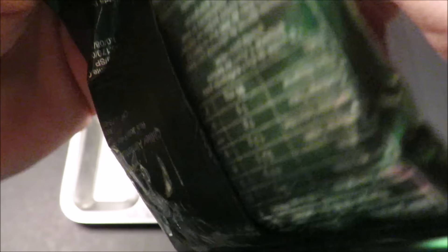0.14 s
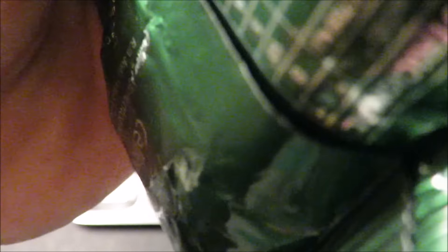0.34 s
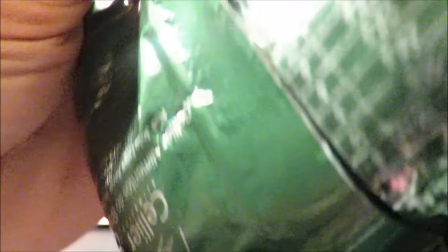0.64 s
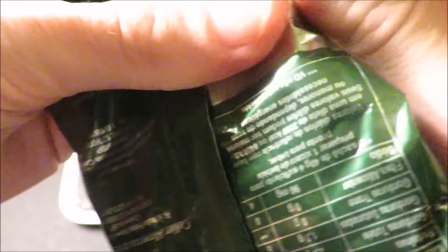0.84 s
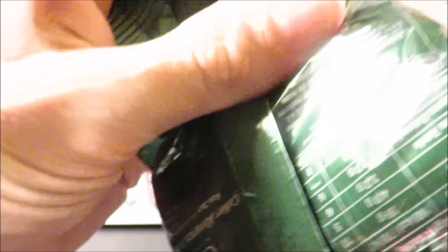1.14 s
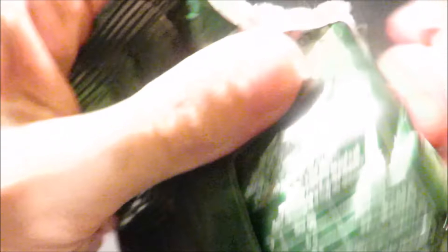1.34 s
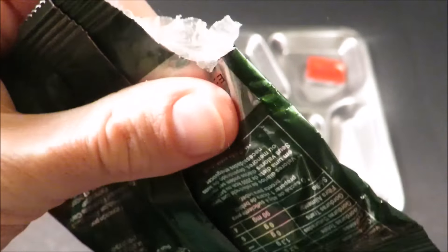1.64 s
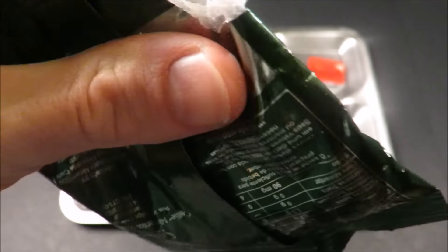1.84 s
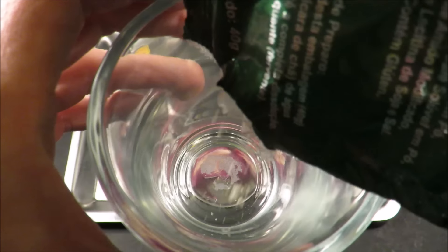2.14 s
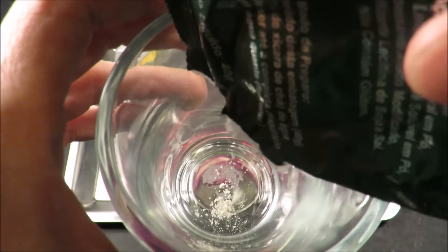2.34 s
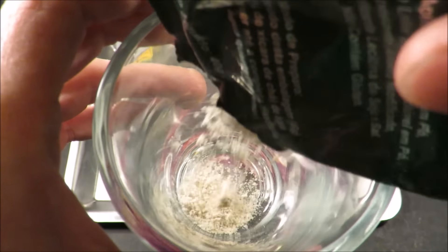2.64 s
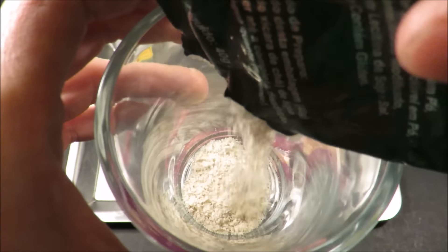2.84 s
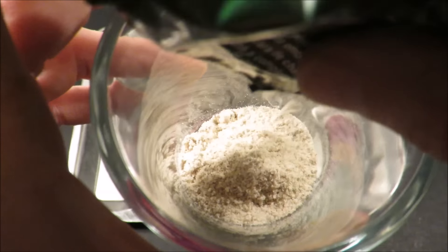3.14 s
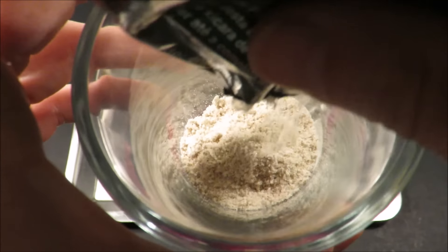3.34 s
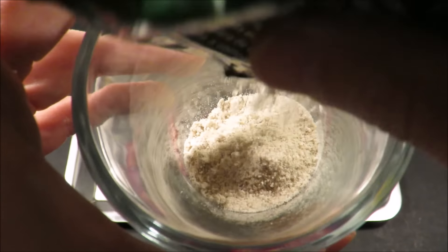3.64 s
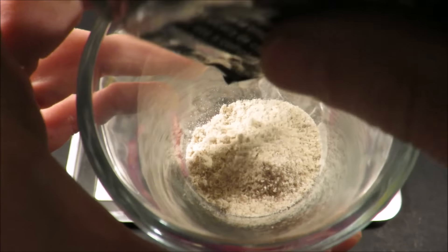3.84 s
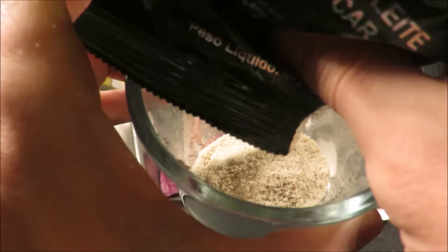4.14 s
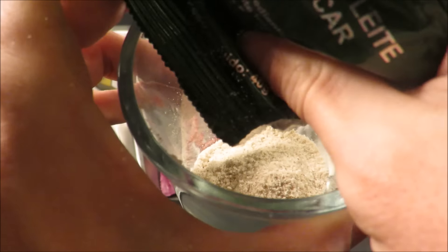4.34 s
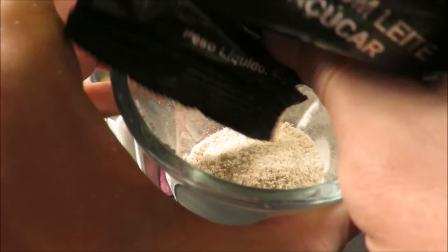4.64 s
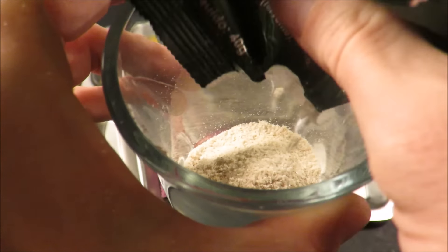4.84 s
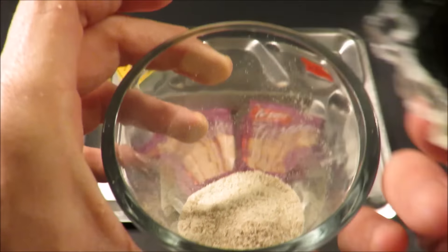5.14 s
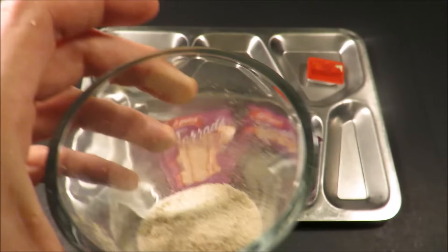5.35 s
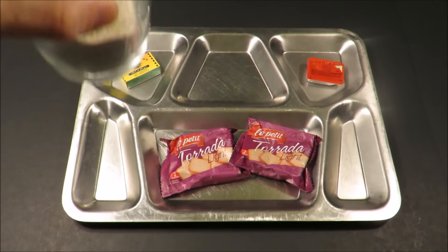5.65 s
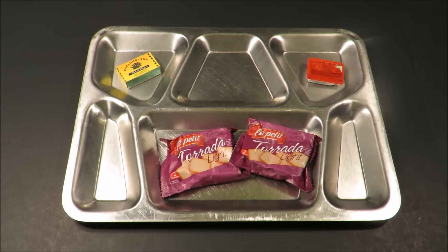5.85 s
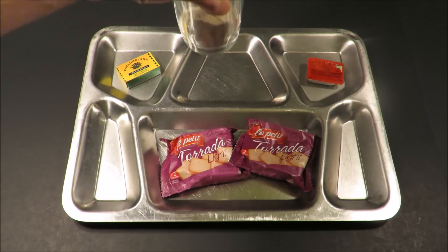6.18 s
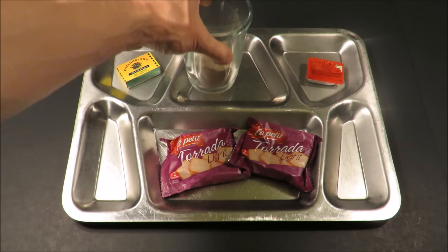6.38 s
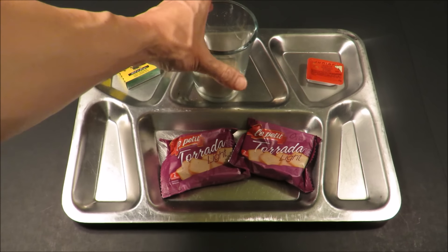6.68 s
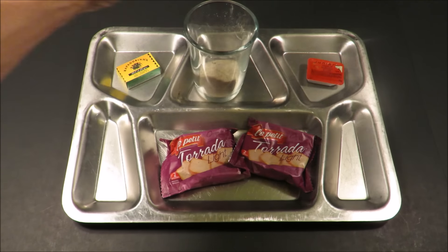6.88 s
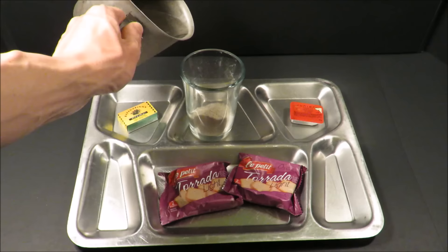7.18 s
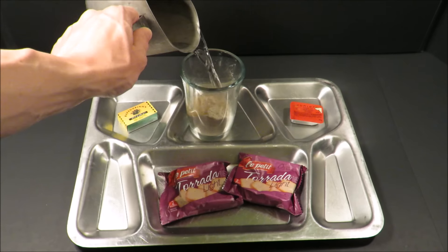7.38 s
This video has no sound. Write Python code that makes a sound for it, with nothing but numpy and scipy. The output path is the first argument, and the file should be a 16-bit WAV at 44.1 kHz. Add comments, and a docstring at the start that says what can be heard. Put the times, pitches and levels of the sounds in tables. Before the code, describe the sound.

A foil sachet crackles and snaps up close, powder hisses into a glass amid bumps, then the glass knocks onto a metal tray and water starts.

```python
"""A small quiet room, the microphone close to a foil sachet pulled open over a drinking glass.
The film creaks, snaps and crunches as its creases buckle; powder hisses and patters into the glass,
whose air rings. The pouch bumps the rim; empty, it is crumpled aside, further off. The glass lands
on a steel tray with two knocks, made of noise and ringing modes, and a thin stream of water starts."""
import sys
import numpy as np
from scipy import signal
from scipy.fft import rfft, irfft
from scipy.io import wavfile
from scipy.ndimage import uniform_filter1d

SR = 44100
rng = np.random.default_rng(int(sys.argv[2]) if len(sys.argv) > 2 else 0)


def int16_out(signal):
    """Quantize to a 16-bit WAV file."""
    q = np.round(np.clip(np.atleast_2d(signal).T, -1, 1) * 32767)
    wavfile.write(sys.argv[1], SR, q.astype(np.int16))


N = 331411
TIME = np.arange(N) / SR


def from_db(db):
    """Decibels to amplitude."""
    return 10 ** (np.asarray(db) / 20)


def rms_one(x):
    """Scale to an RMS of 1."""
    return x / np.sqrt(np.mean(x ** 2) + 1e-20)


def gains(rows):
    """Level columns joined in time, silent outside their span."""
    s, *columns = np.transpose(rows)
    inside = (TIME >= s[0]) & (TIME <= s[-1])
    return [from_db(np.interp(TIME, s, c)) * inside for c in columns]


def swell(s, hold_s, rise_db_per_s, fall_db_per_s):
    """A gain that rises to 1 at time s, holds and falls away."""
    before_db = rise_db_per_s * (s - TIME)
    after_db = fall_db_per_s * (TIME - s - hold_s)
    return from_db(-np.clip(np.maximum(before_db, after_db), 0, 200))


def clumps(per_s, spread_db):
    """A gain that swells and sinks at random, about per_s times a second."""
    levels = rng.standard_normal(N).clip(-2, 2)
    return from_db(spread_db * np.interp(TIME * per_s, np.arange(N), levels))


def add(out, s, sound):
    """Mix a sound into the stereo output at time s."""
    at = round(s * SR)
    out[:, at:at + sound.shape[-1]] += sound[..., :N - at]


def noise(size):
    """White stereo noise, nearly alike on both sides."""
    mid, side = rng.standard_normal((2, size))
    return rms_one(mid + from_db(-6.5) * side * [[1], [-1]])


def colour(x, spectrum):
    """Causal (minimum-phase) filter with this spectrum and unit power gain for white noise."""
    size = 4096
    hz, db = np.transpose(spectrum)
    grid = np.log(np.fft.rfftfreq(size, 1 / SR) + 1)
    cepstrum = irfft(np.log(from_db(np.interp(grid, np.log(hz), db))))
    # folding the cepstrum forward makes the response causal
    cepstrum[1:size // 2] *= 2
    cepstrum[size // 2 + 1:] = 0
    response = irfft(np.exp(rfft(cepstrum)))[:size // 2]
    return signal.fftconvolve(x, response[None] / np.linalg.norm(response))[:, :x.shape[1]]


def dying(t, t60):
    """Exponential decay that reaches -60 dB after t60 seconds."""
    return from_db(-60 * t / t60)


def mode(t, hz, t60):
    """One struck resonance: a decaying sine."""
    return np.sin(2 * np.pi * hz * t) * dying(t, t60)


def ring(clicks, hz, cycles):
    """Each click rings at hz for some cycles (to -60 dB), with the same energy at every pitch."""
    r = from_db(-60 * hz / (cycles * SR))
    feed = np.sqrt(1 - r * r) * np.array([1, 0, -1])
    return signal.lfilter(feed, [1, -2 * r * np.cos(2 * np.pi * hz / SR), r * r], clicks + 1e-18)


def burst(x):
    """Scale a short sound to the energy of one millisecond at level 1."""
    return x / np.sqrt(np.mean(np.sum(x ** 2, axis=-1)) * 1000 / SR)


# faint broadband tone of the room: pitch_hz, level_db (per Hz, relative)
ROOM_TONE = [(55, -22), (550, -22.5), (16000, -44)]


def room_tone():
    """Steady low-weighted noise of the quiet room, rising slightly over the first two seconds."""
    return from_db(np.interp(TIME, [0, 2], [-66, -62])) * colour(noise(N), ROOM_TONE)


def creases(per_s, spread_db, clump_db):
    """Tiny creases give way at random, in little avalanches."""
    born = rng.random(N) < per_s / SR
    heights = from_db(spread_db * np.minimum(rng.exponential(1, N), 3))
    sizes = born * heights * rng.choice([-1, 1], N)
    sizes = sizes * clumps(200, clump_db)
    # dividing by the local level keeps the crackle's loudness even
    local_power = np.abs(uniform_filter1d(sizes ** 2, size=1500))
    return sizes / np.sqrt(local_power + np.mean(sizes ** 2) / 20)


def crackle(clicks, low_hz, high_hz, cycles, hiss_db):
    """Every crease rings a facet with a pitch of its own, over the hiss of sliding film."""
    pitches = np.geomspace(low_hz, high_hz, 20)
    dealt = rng.integers(0, len(pitches), N)
    clicks = clicks * (1 + 0.26 * rng.standard_normal(N) * [[1], [-1]])
    out = np.zeros((2, N))
    for k, hz in enumerate(pitches):
        # the folds favour ever-changing facets
        own_clicks = clicks * (dealt == k) * clumps(45, 5)
        # higher pitches are weighted up to even the power per Hz
        out += np.sqrt(hz) * ring(own_clicks, hz, cycles)
    return rms_one(rms_one(out) + from_db(hiss_db) * noise(N))


# the fingers squeeze the film: start_s, hold_s, strength_db, fine_db (fine creases against broad ones)
SQUEEZES = [(0.034, 0.052, -45.5, -7.5), (0.158, 0.26, -39, -6.5), (0.289, 0.06, -34.5, 3.5),
            (0.558, 0.06, -51, 2.5), (0.798, 0.012, -47.5, -2), (0.875, 0.037, -34.5, -3.5),
            (0.959, 0.066, -41, -3.5), (1.085, 0.016, -31, 0.5), (1.17, 0.14, -50.5, 3.5),
            (1.392, 0.13, -44, -6), (1.49, 0.012, -32.5, -4.5), (1.601, 0.014, -37.5, -7.5),
            (1.688, 0.046, -43, -4.5), (1.782, 0.057, -41, -2.5), (2.025, 0.035, -54, 10),
            (3.633, 0.036, -36.5, -11), (3.816, 0.051, -46.5, -12), (4.039, 0.045, -34, -5.5),
            (4.244, 0.12, -36, -4), (4.417, 0.066, -38.5, -3.5), (4.562, 0.12, -33, -1.5),
            (4.772, 0.06, -32.5, -1), (4.926, 0.046, -37.5, -4), (5.174, 0.012, -43, -13)]
SQUEEZE_RISE_DB_PER_S, SQUEEZE_FALL_DB_PER_S = 591, 334
# between squeezes the held film keeps creaking faintly, until it is taken away
HELD_DB, HELD_FINE_DB, HELD_UNTIL_S = -61, -5, 5.0


def flexing():
    """How hard broad and fine creases are worked: the light hold plus every squeeze, added in power."""
    held = from_db(HELD_DB) * swell(0, HELD_UNTIL_S, SQUEEZE_RISE_DB_PER_S, SQUEEZE_FALL_DB_PER_S)
    broad, fine = held ** 2, (from_db(HELD_FINE_DB) * held) ** 2
    for s, hold_s, db, fine_db in SQUEEZES:
        force = from_db(db) * swell(s, hold_s, SQUEEZE_RISE_DB_PER_S, SQUEEZE_FALL_DB_PER_S)
        broad = broad + force ** 2
        fine = fine + (from_db(fine_db) * force) ** 2
    return np.sqrt(broad), np.sqrt(fine)


# body of the broad creases: pitch_hz, level_db (per Hz, relative)
BROAD_CREASES = [(30, -38), (200, 6.5), (800, 5), (2600, 9), (5500, 2), (9000, -9)]
# sizzle of fine creases and sharp cracks: pitch_hz, level_db (per Hz, relative)
FINE_CREASES = [(500, -111), (3500, 10), (6500, 15.5), (12500, 14.5), (16000, 1.5)]
# the taut walls of the pouch drum along until it is open
DRUM_DB, DRUM_HZ, DRUM_CYCLES, OPEN_AT_S = -13, 330, 2.3, 0.96


def rustle():
    """Harder flexing breaks more creases a second; the same creases sound in every register."""
    broad, fine = flexing() * clumps(60, 1.5)  # the film yields unevenly
    crease_rate = 220 + 5000 * (broad / broad.max()) ** .7
    clicks = creases(crease_rate, spread_db=5.5, clump_db=6.5)
    body = colour(crackle(clicks, 536, 5270, cycles=7.9, hiss_db=-3.5), BROAD_CREASES)
    sizzle = colour(crackle(clicks, 5530, 15600, cycles=24.0, hiss_db=-5.0), FINE_CREASES)
    drum = from_db(DRUM_DB) * (TIME < OPEN_AT_S) * rms_one(ring(clicks, DRUM_HZ, DRUM_CYCLES))
    return broad * (from_db(2.16) * rms_one(body) + drum) + fine * rms_one(sizzle)


# single buckles of the film, loud and faint: start_s, ring_level_db, ring_pitch_hz, crack_level_db
SNAPS = [(0.0352, -23.5, 1840, -44), (0.093, -29.5, 7200, -51), (0.1426, -28, 2280, -32),
         (0.278, -28, 5200, -15.5), (0.4064, -39.5, 4600, -17), (0.4347, -11.5, 3300, -40.5),
         (0.506, -20.5, 2350, -28), (0.5562, -32, 2590, -24.5), (0.6322, -29.5, 2410, -31),
         (0.6842, -37, 1140, -66), (0.9138, -18.5, 750, -37), (1.024, -27, 3500, -29),
         (1.0496, -24.5, 6140, -35), (1.1065, -28, 1820, -13), (1.2568, -23, 3330, -28),
         (1.272, -26.5, 3640, -45), (1.3553, -30.5, 4170, -36), (1.377, -16, 2340, -36),
         (1.6121, -37, 3420, -16.5), (1.6832, -37, 4095, -26), (1.7864, -23.5, 3480, -24),
         (2.4507, -22, 6900, -23), (2.5911, -45, 890, -28), (2.8999, -23.5, 2500, -49),
         (3.0502, -12.5, 1400, -25), (3.122, -30.5, 1290, -39), (3.1526, -20, 2520, -26),
         (3.2155, -30, 1760, -41), (3.368, -30.5, 1510, -47), (3.659, -14, 2300, -15),
         (4.0956, -16, 5620, -22), (4.7374, -25, 2280, -42), (5.0433, -28, 4180, -35),
         (5.1096, -36, 2380, -66), (5.1472, -25.5, 1140, -61), (5.25, -42, 2620, -43)]


def snaps():
    """A facet pops through: a crack, a few cycles of the facet, a faint shiver around its pitch."""
    out, t = np.zeros((2, N)), TIME[:SR // 20]
    for s, ring_db, hz, crack_db in SNAPS:
        facet = burst(ring(ring(t == 0, hz, 6), hz, 1.3))
        lean = from_db(rng.normal(0, 0.26) * np.array([[1], [-1]]))  # slightly to one side
        shiver = burst(ring(noise(len(t)) * dying(t, .016), hz, 2.5))
        crack_decay = dying(t, .0018) + from_db(-21) * dying(t, .014)
        crack = burst(colour(noise(len(t)) * crack_decay, FINE_CREASES))
        ringing = lean * facet + from_db(-2.5) * shiver
        add(out, s, from_db(ring_db) * ringing + from_db(crack_db) * crack)
    return out


# a whole fold collapses: start_s (the peak), ring_level_db, ring_pitch_hz, crack_level_db
CRUNCHES = [(0.172, -19, 2410, -21.5), (0.295, -14.5, 1990, -29), (0.315, -16.5, 700, -27),
            (1.474, -22.5, 1490, -29.5), (1.826, -24.5, 1020, -25), (2.857, -21.5, 3000, -17),
            (3.181, -34, 1010, -55), (3.251, -17.5, 2060, -26), (3.639, -21, 1190, -30),
            (3.806, -11.5, 1600, -11.5), (4.080, -10, 2780, -17), (4.2332, -17.5, 1750, -26.5),
            (4.278, -14, 1480, -22), (4.4195, -16, 1140, -18.5), (4.794, -11.5, 1813, -16),
            (5.987, -17.5, 2180, -49)]
CRUNCH_T60_S, CRUNCH_FACETS_OCTAVES = 0.026, 0.54  # facets spread this far either way


def crunches():
    """A run of buckles swells and dies within milliseconds and rings several facets of unlike size."""
    out, t, lead_s = np.zeros((2, N)), TIME[:SR // 16], .012
    for s, ring_db, hz, crack_db in CRUNCHES:
        run = dying(np.maximum(t - lead_s, 2 * (lead_s - t)), CRUNCH_T60_S)
        pitches = hz * 2 ** (CRUNCH_FACETS_OCTAVES * np.linspace(-1, 1, num=5))
        # single buckles make the run uneven
        run = run * from_db(6 * np.interp(t * 1500, np.arange(len(t)), rng.standard_normal(len(t))))
        facets = burst(sum(burst(ring(noise(len(t)) * run, min(f, SR / 3), 5.2)) for f in pitches))
        crack = burst(colour(noise(len(t)) * run ** 2, FINE_CREASES))
        add(out, s - lead_s, from_db(ring_db) * facets + from_db(crack_db) * crack)
    return out


# a whole wall of the pouch flips outward: start_s, level_db
FLIPS = [(0.913, -25.5), (1.106, -25)]
FLIP_T60_S = 0.029
# soft film against fingers or glass: pitch_hz, level_db (per Hz, relative)
SCUFF = [(35, -12.5), (260, 10.5), (1500, 3), (5000, -23)]


def flips():
    """As the pouch is pulled open its walls flip with a soft, low thump."""
    out, t = np.zeros((2, N)), TIME[:SR // 10]
    for s, db in FLIPS:
        add(out, s, from_db(db) * burst(colour(noise(len(t)) * dying(t, FLIP_T60_S), SCUFF)))
    return out


# powder sliding into the hand-held glass: start_s, level_db
POUR = [(2.1, -62), (2.4, -49), (2.9, -47), (4.7, -51), (5.4, -68)]
# powder falling into the glass: pitch_hz, level_db (per Hz, relative)
POWDER = [(25, -21), (60, 5.5), (300, -2), (900, -6), (1700, -2), (2400, -9), (16000, -33)]
LUMPS_PER_S, LUMP_T60_S, LUMP_RING_DB = 55, 0.068, -7
# while the pouch is tipped, powder hisses over the film
SLIDE_AT_S, SLIDE_HOLD_S, SLIDE_DB, SLIDE_RISE_DB_PER_S = 2.673, 0.42, -45, 18
# powder over film: pitch_hz, level_db (per Hz, relative)
SLIDE = [(300, -13.5), (2000, 4.5), (16000, -4.5)]
GLASS_AIR_HZ, GLASS_AIR_T60_S = 756, 0.044
GLASS_AIR_CYCLES = GLASS_AIR_HZ * GLASS_AIR_T60_S


def powder():
    """Powder hisses over the film and drops in spurts; lumps patter and ring the air in the glass."""
    drops = (rng.random(N) < LUMPS_PER_S / SR) * rng.uniform(0.32, 1, N)
    spurts = .5 + rms_one(signal.fftconvolve(drops, dying(TIME[:SR // 10], LUMP_T60_S))[:N])
    grains = rms_one(noise(N) + 2 * rms_one(creases(1000, spread_db=5, clump_db=2)))
    patter = rms_one(spurts * colour(grains, POWDER))
    air = from_db(LUMP_RING_DB) * rms_one(ring(drops, GLASS_AIR_HZ, GLASS_AIR_CYCLES))
    tipped = swell(SLIDE_AT_S, SLIDE_HOLD_S, SLIDE_RISE_DB_PER_S, SQUEEZE_FALL_DB_PER_S)
    slide = from_db(SLIDE_DB) * tipped * rms_one(spurts * colour(grains, SLIDE))
    return gains(POUR)[0] * (patter + air) + slide


# the sachet hangs over the glass between these times
OVER_GLASS_FROM_S, OVER_GLASS_TO_S, HOLLOW_DB = 2.4, 5.0, -22.5


def hollow(film):
    """Crinkling over the mouth of the glass sets the air inside ringing."""
    over = (TIME > OVER_GLASS_FROM_S) & (TIME < OVER_GLASS_TO_S)
    return from_db(HOLLOW_DB) * ring(film * over, GLASS_AIR_HZ, GLASS_AIR_CYCLES)


# sachet bumps the glass: start_s, thud_level_db, hollow_ring_level_db, thud_pitch_hz
BUMPS = [(2.593, -36, -33, 137), (2.651, -39, -31, 292), (2.733, -40, -51, 124), (2.858, -27.5, -26, 157),
                 (3.05, -34.5, -19, 138), (3.249, -33, -24.5, 293), (3.438, -44, -36, 416),
         (3.531, -18.5, -23, 237), (3.5856, -20, -15.5, 222), (3.628, -25, -26, 121),
         (3.796, -25, -21.5, 261), (3.946, -28.5, -38, 275), (4.417, -55, -25, 330)]


def bumps():
    """The soft pouch brushes the rim, thuds on it and sets the air in the glass ringing."""
    out, t = np.zeros((2, N)), TIME[:SR // 10]
    for s, thud_db, ring_db, hz in BUMPS:
        scuff = from_db(thud_db) * burst(colour(noise(len(t)) * dying(t, 0.042), SCUFF))
        add(out, s - .011, scuff / 3)  # the brush just before the thud
        thud = from_db(5.5) * scuff - from_db(thud_db) * mode(t, hz, 0.058)
        add(out, s, thud + from_db(ring_db) * mode(t, GLASS_AIR_HZ, GLASS_AIR_T60_S))
    return out


# empty sachet crumpled further off: start_s, level_db (before an overall trim)
ASIDE = [(5.5, -65), (5.93, -30.5), (5.974, -36.5), (5.988, -29.5), (6.074, -31), (6.15, -34.5),
         (6.438, -35.5), (6.534, -26), (6.625, -46)]
# film heard from a distance: pitch_hz, level_db (per Hz, relative)
FAR_FILM = [(80, -14.5), (450, -13), (1100, -6.5), (2400, -5.5), (16000, -26.5)]
# once let go, it slowly unfolds
UNFOLD_DB, UNFOLD_FALL_DB_PER_S = -53, 18


def far_sachet():
    """The empty sachet is crumpled aside in gritty flurries, then creeps open again on its own."""
    clicks = creases(5000, spread_db=3.8, clump_db=3)
    far_creases = crackle(clicks, 500, 13000, cycles=14.0, hiss_db=-2)
    let_go_s = ASIDE[-1][0]
    unfolding = from_db(UNFOLD_DB) * swell(let_go_s, 0, SQUEEZE_RISE_DB_PER_S, UNFOLD_FALL_DB_PER_S)
    crumpling = from_db(-4.0) * gains(ASIDE)[0]
    return (crumpling + unfolding) * clumps(90, 2.24) * colour(far_creases, FAR_FILM)


# glass lands on the tray: start_s, clack_level_db, thump_level_db, thump_pitch_hz, ring_level_db
LANDINGS = [(6.6168, -8.5, -4, 302, -30), (6.672, -32, -10.5, 716, -29.5)]
# glass base against steel: pitch_hz, level_db (per Hz, relative)
CLACK = [(200, -15), (850, -2.5), (4500, -10), (16000, -25.5)]
# modes of the steel tray: pitch_hz, level_db (relative)
TRAY = [(822, 4), (1015, -2), (1535, -0.5), (2245, -6), (2510, -18)]
TRAY_T60_S = 0.19
# the glass rocks to rest with a rough, sinking note
SETTLE_AT_S, SETTLE_DB = 6.728, -39
SETTLE_FROM_HZ, SETTLE_TO_HZ, SETTLE_GLIDE_S = 930, 450, 0.023


def landings():
    """One edge of the base hits the tray, then the other; the steel rings and the glass rocks to rest."""
    out, t = np.zeros((2, N)), TIME[:SR // 2]
    for s, clack_db, thump_db, thump_hz, ring_db in LANDINGS:
        clack_decay = dying(t, 0.032) + from_db(-19) * dying(t, TRAY_T60_S)
        clack = colour(noise(len(t)) * clack_decay, CLACK)
        # the weight of the glass pushes the tray down; its floor drums
        thump = burst(ring(t == 0, thump_hz, 1.9))
        clack = clack + from_db(-18.5) * mode(t, 115.0, 0.24)
        # the chattering base keeps exciting the steel
        chatter = noise(len(t)) * clumps(250, 3)[:len(t)] * dying(t, TRAY_T60_S)
        steel = 0
        for hz, db in TRAY:
            struck = rng.choice([-1, 1]) * mode(t, hz, TRAY_T60_S)
            steel = steel + from_db(db) * (struck + 0.8 * ring(chatter, hz, 9))
        knock = from_db(clack_db) * clack + from_db(thump_db) * thump
        add(out, s, knock + from_db(ring_db) * steel)
    sinking_hz = SETTLE_TO_HZ + (SETTLE_FROM_HZ - SETTLE_TO_HZ) * np.exp(-t / SETTLE_GLIDE_S)
    uneven = np.interp(t * 160, np.arange(len(t)), rng.standard_normal(len(t)))
    note = np.sin(2 * np.pi * np.cumsum(sinking_hz) / SR) * dying(t, TRAY_T60_S)
    add(out, SETTLE_AT_S, from_db(SETTLE_DB) * uneven * note)
    return out


# thin stream of water: pitch_hz, level_db (per Hz, relative)
WATER = [(5000, -6.5), (16000, -16)]


def water():
    """A thin stream starts abruptly: noise, weaker towards the top, its level fluttering at random."""
    stream = gains([(7.298, -57), (7.52, -52)])[0]  # start_s, level_db
    return stream * clumps(140, 0.81) * colour(noise(N), WATER)


def room(x, t60, wet_db):
    """A small room answers with a short tail of decaying noise, different on each side."""
    t = TIME[:SR // 2]
    decay = rng.standard_normal((2, len(t))) * dying(t, t60) * (t > .004)
    tail = colour(decay, [(2500, -14.0), (14000, -13.5)])
    return x + from_db(wet_db) * signal.fftconvolve(x, tail / np.linalg.norm(tail[0]), axes=1)[:, :N]


def scene():
    """Near film and glass with the room's answer, then powder, far sachet, water and room tone."""
    film = rustle()
    near = film + snaps() + crunches() + flips() + hollow(film) + bumps() + landings()
    return room(near, t60=0.14, wet_db=-18.0) + powder() + far_sachet() + water() + room_tone()


CUTOFF_HZ = 17000


def record(dry):
    """Short waves differ more between the capsules; the level dips briefly; peaks round, top is cut."""
    mid, side = (dry[0] + dry[1]) / 2, (dry[0] - dry[1]) / 2
    side = side + 0.57 * np.diff(side, prepend=0)
    dip = np.where((TIME > 7.267) & (TIME < 7.298), from_db(-17), 1)
    top = .72  # no peak passes this before the cut
    rounded = top * np.tanh(np.array([mid + side, mid - side]) * dip / top)
    return signal.sosfilt(signal.cheby2(14, 60, CUTOFF_HZ, fs=SR, output="sos"), rounded)


dry = scene()
out = record(dry)
int16_out(out)
```